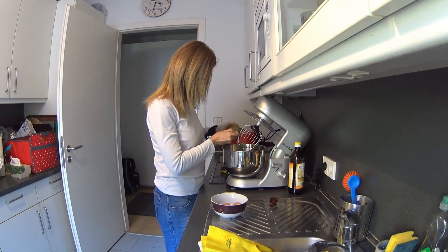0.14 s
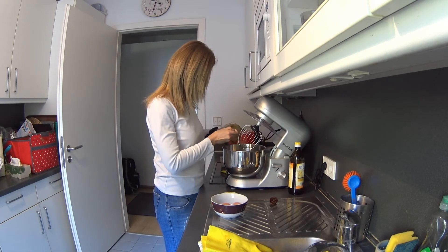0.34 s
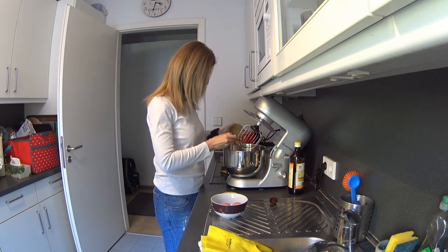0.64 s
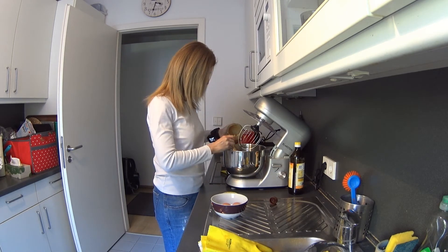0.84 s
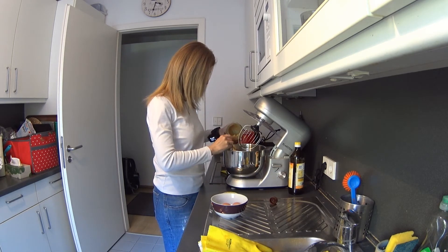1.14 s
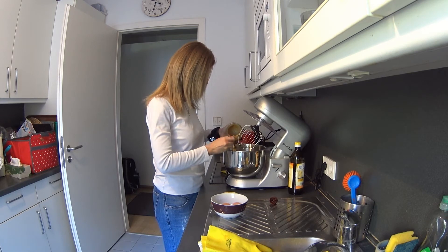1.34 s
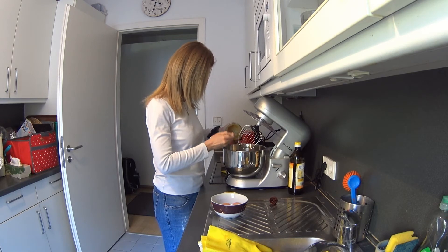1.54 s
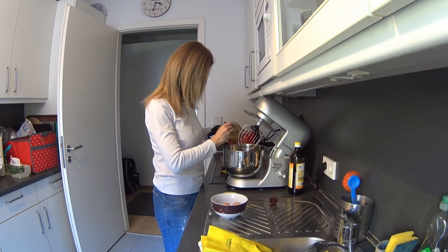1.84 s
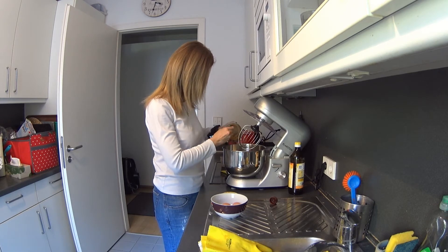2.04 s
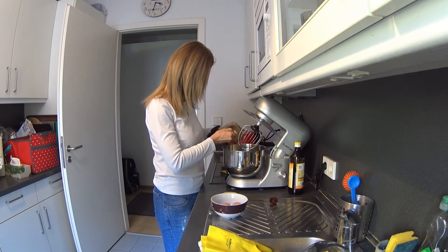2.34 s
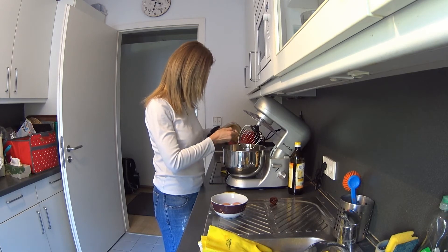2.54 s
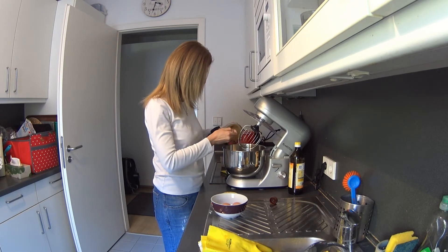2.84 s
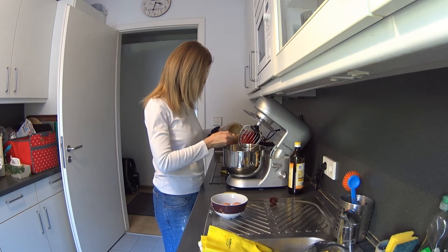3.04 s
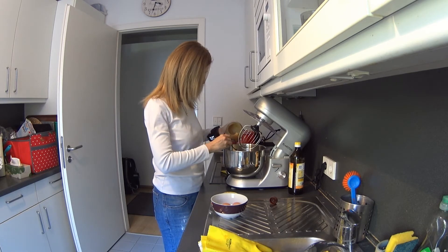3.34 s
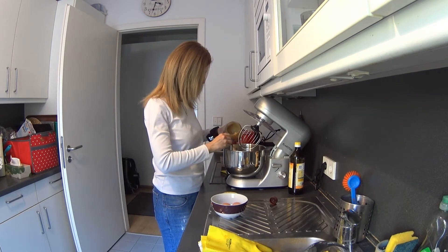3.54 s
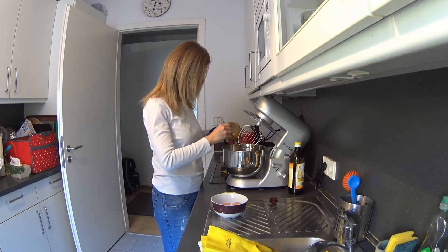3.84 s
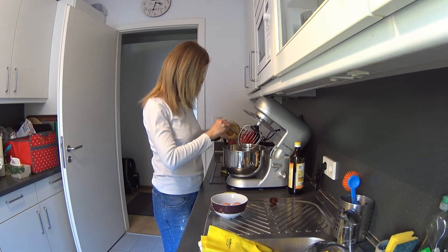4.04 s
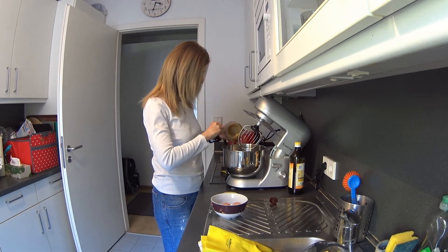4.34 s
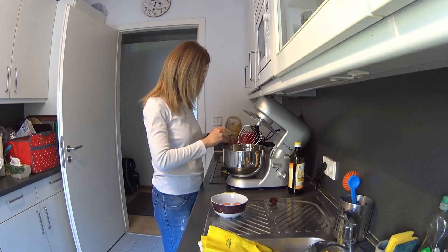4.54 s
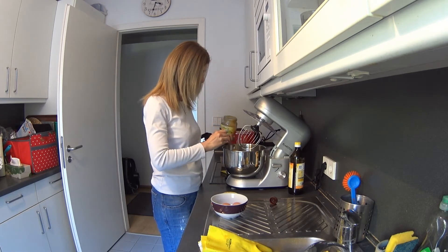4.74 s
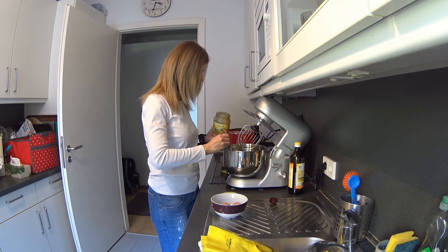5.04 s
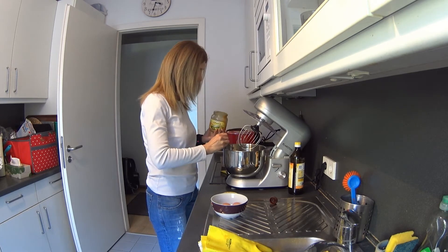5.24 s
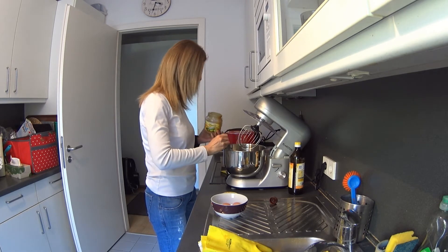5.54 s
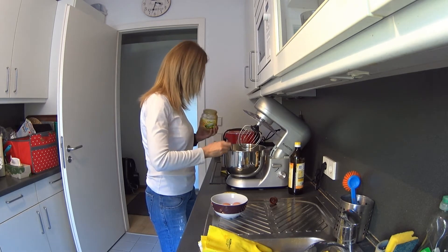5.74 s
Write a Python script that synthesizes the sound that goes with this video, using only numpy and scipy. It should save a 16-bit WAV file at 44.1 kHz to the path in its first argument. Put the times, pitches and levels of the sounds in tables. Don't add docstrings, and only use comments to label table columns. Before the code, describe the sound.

Bright glass-and-metal clinks, one short gritty scrape, then a soft footfall and shoe slide, over quiet room hiss and fridge hum.

```python
import sys
import numpy as np
from scipy import signal
from scipy.fft import rfft, irfft, next_fast_len
from scipy.io import wavfile
from scipy.ndimage import uniform_filter1d

SR = 44100
rng = np.random.default_rng(int(sys.argv[2]) if len(sys.argv) > 2 else 0)


def persist_wave(psi):
    counts = np.round(np.clip(psi, -1, 1) * 32767).astype(np.int16)
    wavfile.write(sys.argv[1], SR, np.atleast_2d(counts).T)


def undo_db(level):
    steps = np.asarray(level, float) / 20
    return 10 ** steps


N = 259616


def on_log(table, hz):
    f, v = np.transpose(table)
    return np.interp(np.log(np.maximum(hz, 1)), np.log(f), v)


def shaped(x, table):
    n = x.shape[-1]
    size = next_fast_len(n)
    gain = undo_db(on_log(table, np.fft.rfftfreq(size, 1 / SR)))
    return irfft(rfft(x, size) * gain, size)[..., :n]


def unit(x):
    return x / np.sqrt(np.mean(x ** 2))


def add(out, s, x):
    i = int(s * SR)
    out[i:i + len(x)] += x[:len(out) - i]


def ring(hz, strength, rise_cycles, twin_db=-13):
    t = np.arange(SR // 3) / SR
    hz = np.reshape(hz, (-1, 1))
    db, t60 = np.transpose(strength)[:, :, None]
    off = 1 + 0.024 * rng.standard_normal((2, len(hz), 1))
    hz = np.r_[hz, hz * off[0], hz * off[1]]
    db = np.r_[db, db + twin_db, db + twin_db]
    t60 = np.r_[t60, 0.45 * t60, 0.45 * t60]
    sign = rng.choice([-1, 1], size=hz.shape)
    swell = 1 - np.exp(-t * hz / rise_cycles)
    decay = np.exp(-np.log(1000) * t / np.clip(t60, 0.004, 0.4))
    y = (sign * undo_db(db) * swell * decay * np.sin(2 * np.pi * hz * t)).sum(axis=0)
    return y / np.abs(y).max()


def blows(hits, hz, strength, rise_cycles, low_hz):
    out = np.zeros(N)
    body = ring(hz, strength, rise_cycles)
    t = np.arange(SR // 25) / SR
    thin = signal.butter(4, low_hz, "high", fs=SR, output="sos")
    dull = signal.butter(2, [330, 1400], "band", fs=SR, output="sos")
    for s, db, ms, crack_db, thud_db in hits:
        push = t[:200] * np.exp(-t[:200] / (max(ms, 0.005) / 1000))
        noise = rng.standard_normal((2, len(t))) * np.minimum(t / 0.0023, 1)
        crack = signal.sosfilt(thin, noise[0] * np.exp(-t / 0.0098))
        thud = 4 * signal.sosfilt(dull, noise[1] * np.exp(-t / 0.01))
        add(out, s, undo_db(db) * body)
        add(out, s, undo_db(db + crack_db) * np.convolve(crack, push / push.sum()))
        add(out, s, undo_db(db + thud_db) * thud)
    return out


def knocks(events, spread, rub_s):
    out = np.zeros(N)
    t = np.arange(SR // 40) / SR
    for s, db, hz, t60 in events:
        detune = spread * np.clip(np.r_[0, rng.standard_normal(2)], -2, 2)
        body = ring(hz * (1 + detune), [(-3.0, t60), (-5.0, t60), (-10.0, t60)], rise_cycles=0.16)
        rub = (0.39 + rng.standard_normal(len(t))) * np.exp(-t / rub_s)
        knock = signal.fftconvolve(body, rub)
        add(out, s, undo_db(db) * knock / np.abs(knock).max())
    return out


# pitch in Hz, level in dB, line width in Hz, wobble share.
FRIDGE_LINES = [(48.5, -50, 3.8, 0.27), (72.6, -60, 7.7, 0.36), (93.7, -68, 8, .55), (100, -62, 11, 0.81),
                (592, -70.5, 3, 0.46), (4160, -85, 2, 1)]


def fridge():
    t, out = np.arange(N) / SR, 0
    for hz, db, width_hz, share in FRIDGE_LINES:
        k = int(SR / width_hz)
        wobble = [unit(uniform_filter1d(uniform_filter1d(rng.standard_normal(N), k), k)) for _ in range(2)]
        drift = 1.32 + share * (wobble[0] + 1j * wobble[1])
        out = out + undo_db(db) * np.real(drift * np.exp(2j * np.pi * hz * t))
    return out


# frequency in Hz, density in dB per Hz.
AIR_COLOUR = [(15, -23), (35, -17.5), (100, -11), (140, -16), (300, -19), (700, -25.5), (1270, -28),
              (4230, -37), (6500, -42.5), (7600, -50.5), (8600, -45), (9400, -47), (10200, -51.5),
              (11000, -46.5)]
# frequency in Hz, side minus mid in dB.
AIR_WIDTH = [(60, -12), (110, -8), (190, -2.5), (340, 0), (610, 4.5), (1100, 5), (1960, 4), (3510, 1),
             (6270, -3.5), (11200, -8.5)]


def air():
    mid, side = shaped(rng.standard_normal((2, N)), AIR_COLOUR)
    return undo_db(-56) * np.array([mid, shaped(side, AIR_WIDTH)]) / np.std(mid)


# start in seconds, peak level in dB, held level in dB,
# top frequency in Hz at the peak, top frequency in Hz once slowed.
FOOT_SLIDES = [
    (.001, -51.5, -64.5, 2800, 1200),
    (5.755, -45, -55, 4220, 3750),
]


def shuffle():
    onset_s, settle_s, length_s = 0.011, 0.045, 0.45
    lead_db, lead_s = -14.5, 0.07
    out, t = np.zeros(N), np.arange(N) / SR
    unevenness = unit(uniform_filter1d(rng.standard_normal(N), 150))
    grain = rng.standard_normal(N) * undo_db(1.2 * unevenness)
    for s, peak_db, held_db, fast_hz, slow_hz in FOOT_SLIDES:
        dull, sharp = (unit(shaped(grain, [(60, -20), (300, 0), (hz / 2.2, -3), (hz, -9), (hz * 2.0, -34)]))
                       for hz in (slow_hz, fast_hz))
        early, late = np.maximum(s - t, 0), np.maximum(t - s, 0)
        speed = np.exp(-late / settle_s)
        db = held_db + (peak_db - held_db) * speed + lead_db * (1 - np.exp(-early / onset_s))
        moving = (early < lead_s) * (late < length_s)
        out += moving * undo_db(db) * (dull + speed * (sharp - dull))
    return out


# start in seconds, level in dB, pitch in Hz, t60 in seconds.
FOOTFALLS = [
    (5.655, -43, 40, .08),
    (5.697, -37, 40, .14),
    (5.72, -42, 98, .15),
    (5.785, -45, 98, .12),
    (.002, -46, 95, .1),
]


def footsteps():
    return knocks(FOOTFALLS, spread=0.09, rub_s=0.0012)


# start in seconds, level in dB, pitch in Hz.
FOOD_CLICKS = [(.01, -48.5, 900), (.035, -40, 1340), (.05, -45.5, 480), (.19, -45.5, 480), (.235, -48, 480),
               (.795, -57, 7470), (.796, -67, 9600), (.89, -49, 1970), (1.045, -63, 7600),
               (1.14, -68, 9350), (3.446, -64, 9050), (3.447, -61, 5240), (3.82, -61.5, 8130),
               (4.75, -64, 8970), (5.1, -50, 950), (5.45, -56.5, 9500), (5.455, -59, 4480),
               (5.675, -57.5, 7600), (5.69, -61.5, 9000)]


def food_clicks():
    return knocks([(s, db, hz, min(62 / hz, 0.064)) for s, db, hz in FOOD_CLICKS], spread=0.05, rub_s=0.0024)


# start in seconds, level in dB, contact in ms, crack in dB, thud in dB.
TOUCH_HITS = [
    (.128, -21.5, 0.032, -6.5, -23),
    (.145, -36, .03, -14, -17),
]
TOUCH_HZ = [(474, 641, 1355, 2007, 2089, 2277, 2353, 2842, 2948, 3953, 4171, 4752, 5340, 5687, 6476, 7051, 7301, 9292, 10872, 10990)]
# level in dB, t60 in seconds.
TOUCH_MODES = [(-27, 0.095), (-22.5, 0.077), (-33, 0.13), (-24, 0.1), (-16, 0.079), (-2.5, 0.057),
               (-8, 0.088), (-19, 0.084), (-21, 0.055), (-33, 0.13), (-28, 0.055), (-25, 0.082),
               (-17, 0.043), (-21, 0.059), (-24, 0.056), (-19, 0.05), (-17, 0.075), (-32, 0.1),
               (-40, 0.083), (-31, 0.072)]


def light_touch():
    return blows(TOUCH_HITS, TOUCH_HZ, TOUCH_MODES, rise_cycles=2.8, low_hz=1740)


CLOCK_PITCHES = [(820, 1130, 1367, 1970, 2400, 3630)]
# level in dB, t60 in seconds.
CLOCK_MODES = [(3, 0.08), (-11.5, 0.07), (-12.5, 0.047), (-13.5, 0.066), (-17, .03), (-15.5, 0.016)]
# level in dB, contact in ms, crack in dB, thud in dB.
HAND_RELEASE = (-49.5, 0.3, -8.5, -8)
# level in dB, contact in ms, crack in dB, thud in dB.
HAND_CATCH = (-44.5, 0.4, -6, -10)


def wall_clock():
    ticks = []
    for s in 0.874 + 1.0003 * np.arange(6):
        ticks += [(s, *HAND_RELEASE), (s + 0.014, *HAND_CATCH)]
    ticks = [row for row in ticks if row[0] < N / SR]
    return blows(ticks, CLOCK_PITCHES, CLOCK_MODES, rise_cycles=1.5, low_hz=900)


# start in seconds, level in dB, contact in ms, crack in dB, thud in dB.
RIM_TAPS = [
    (1.9112, -8.5, 0.0041, -11.5, -28.5),
    (1.917, -13, .01, -5, -22.5),
]
RIM_PITCHES = [(670, 1996, 2058, 2202, 2249, 2392, 2869, 2947, 3088, 3143, 3795, 3895, 4060, 4860, 4935, 5061, 5228, 5412, 5487, 5696, 6031, 6476, 7005, 8169, 8795, 9026, 10805, 10968)]
# level in dB, t60 in seconds.
RIM_MODES = [(-27, 0.087), (-30.5, 0.061), (-27, 0.097), (-12, 0.14), (-6.5, 0.053), (-16.5, 0.049),
             (-9.5, 0.092), (-37.5, 0.097), (-13, 0.047), (-9.5, 0.079), (-24.5, 0.12), (-30.5, 0.043),
             (-1.5, 0.26), (-25.5, 0.13), (-17.5, 0.43), (-33.5, 0.13), (-3, 0.023), (-12.5, 0.09),
             (-32.5, 0.03), (-13, 0.073), (-15, 0.084), (-12, 0.073), (-23.5, 0.09), (-22.5, 0.09),
             (-34, 0.036), (-20, 0.09), (-18.5, 0.19), (-18, 0.079)]


def rim_tap():
    return blows(RIM_TAPS, RIM_PITCHES, RIM_MODES, rise_cycles=2.5, low_hz=2240)


# start in seconds, level in dB, contact in ms, crack in dB, thud in dB.
WALL_TAPS = [
    (2.141, -6, 0.018, -15.5, -34.5),
    (2.1435, -17.5, 0.018, -15, -20.5),
]
WALL_PITCHES = [(671, 765, 822, 2205, 2566, 3089, 3166, 3313, 3415, 4158, 4341, 4937, 5150, 5257, 5718, 5872, 6370, 6416, 6803, 7362, 7734, 9065, 9236, 9413, 10584, 10680, 10739, 10826)]
# level in dB, t60 in seconds.
WALL_MODES = [(-13.5, 0.074), (-27, 0.062), (-27.5, 0.022), (-4.5, 0.097), (-6.5, 0.029), (-21.5, 0.15),
              (-6, 0.045), (-12, 0.067), (-24, 0.28), (-11, 0.037), (-8, 0.046), (-10.5, 0.05),
              (-15.5, 0.049), (-32.5, 0.055), (1, 0.03), (-17, 0.2), (-32, 0.048), (-21.5, 0.085),
              (-30, 0.12), (-25.5, 0.15), (-30, 0.037), (-19, 0.057), (-13, 0.029), (-52, 0.04),
              (-30.5, 0.12), (-41, 0.25), (-51.5, 0.11), (-27.5, 0.065)]


def wall_tap():
    return blows(WALL_TAPS, WALL_PITCHES, WALL_MODES, rise_cycles=4.0, low_hz=1770)


# start in seconds, level in dB, contact in ms, crack in dB, thud in dB.
FIRM_HITS = [
    (4.102, -5, 0.041, -8, -28.5),
    (4.108, -12.5, .03, -9, -26.5),
]
FIRM_HZ = [(445, 639, 1709, 1870, 2063, 2266, 2425, 2521, 2987, 3095, 3189, 3818, 3916, 4126, 4384, 4490, 4546, 4642, 5296, 5410, 5771, 6046, 6475, 6620, 7254, 7328, 9102, 9308)]
# level in dB, t60 in seconds.
FIRM_MODES = [(-25.5, 0.11), (-23, 0.093), (-34, 0.14), (-26, 0.17), (-12, 0.11), (-2.5, 0.15), (-11, 0.12),
              (-12.5, 0.09), (-27.5, 0.13), (-16.5, 0.055), (-9.5, 0.18), (-25, 0.15), (-12.5, 0.15),
              (-15, 0.12), (-11.5, 0.05), (-14.5, 0.084), (-20.5, 0.051), (-20, 0.09), (-29.5, 0.14),
              (-5.5, 0.055), (-20.5, 0.12), (-10.5, 0.071), (-21, 0.1), (-10, 0.1), (-6, 0.14), (-21, 0.11),
              (-27.5, 0.13), (-30, 0.12)]


def firm_blow():
    return blows(FIRM_HITS, FIRM_HZ, FIRM_MODES, rise_cycles=1.2, low_hz=1600)


SCRAPE_HZ = [(447, 670, 774, 1881, 2064, 2132, 2260, 2427, 2573, 3188, 3548, 3675, 3925, 4380, 5196, 5373, 5490, 5774, 6296, 6366, 7058, 7150, 7228, 7332, 8395, 9041, 9971, 10888)]
# level in dB, t60 in seconds.
SCRAPE_MODES = [(-21.5, 0.12), (-9.5, 0.081), (-21, 0.12), (-25, 0.068), (-12, 0.083), (-8.5, 0.047),
                (3.5, 0.053), (-9.5, 0.12), (-28, 0.16), (-8.5, 0.17), (-21, 0.11), (-16.5, 0.11),
                (-17, 0.14), (-22, 0.16), (-3, 0.039), (-6.5, 0.079), (-24, 0.12), (-10.5, 0.034),
                (-29, 0.073), (-34, 0.1), (-33, 0.089), (-17, 0.086), (-28, 0.12), (-15, 0.066),
                (-31, 0.09), (-22, 0.062), (-24, 0.047), (-22.5, 0.077)]
# centre in seconds, extra level in dB.
PRESSURE_SURGES = [
    (4.311, 3.8),
    (4.372, 2.3),
]


def scrape():
    start_s, end_s, level_db = 4.283, 4.378, -34
    grip_db_per_s, lift_db_per_s, surge_s = 1500, 950, 0.012
    flick_s, flick_rise_s, slow_treble_db, fast_treble_db = 4.349, 0.0067, -10.5, 3.5
    t = np.arange(N) / SR
    db = level_db - grip_db_per_s * np.maximum(start_s - t, 0) - lift_db_per_s * np.maximum(t - end_s, 0)
    for s, more_db in PRESSURE_SURGES:
        db = db + more_db * np.exp(-((t - s) / surge_s) ** 2)
    flick = 0.5 * (1 + np.tanh((t - flick_s) / flick_rise_s / 2))
    treble_db = slow_treble_db + (fast_treble_db - slow_treble_db) * flick
    slips = rng.random(N) < 7000 / SR
    clicks = slips * rng.standard_normal(N) * undo_db(1.2 * rng.exponential(size=N))
    clicks = unit(clicks) * undo_db(np.maximum(db, -200))
    slow = shaped(clicks, [(3000, 0.5), (6000, -4.5), (11000, -8.5)])
    bright = np.diff(clicks * undo_db(treble_db), 2, prepend=[0, 0])
    force = slow + bright
    body = ring(SCRAPE_HZ, SCRAPE_MODES, rise_cycles=0.45)
    ringing = signal.fftconvolve(force, body)[:N] / np.sqrt(np.sum(body ** 2))
    grit = shaped(force, [(250, -43), (600, 2), (2500, -6), (4500, -0.5), (5400, -1.5), (7000, -2.5),
                          (11000, -25.5)])
    return ringing + grit


# frequency in Hz, t60 in seconds.
KITCHEN_T60 = [(250, 0.33), (1000, 0.4), (3000, 0.39), (6000, 0.3), (11000, 0.19)]
# frequency in Hz, side minus mid in dB.
KITCHEN_WIDTH = [(100, -29), (300, -4), (600, -7), (1500, -1.5), (3000, -4), (6000, -8), (11000, -5)]


def room(x):
    t, tail = np.arange(SR // 2) / SR, 0
    for hz in 88 * 2.0 ** np.arange(8):
        octave = [(hz / 2, -40), (hz / 1.3, 0), (hz * 1.3, 0), (hz * 2, -40)]
        band = shaped(rng.standard_normal((2, len(t))), octave)
        tail = tail + band * np.exp(-np.log(1000) * t / on_log(KITCHEN_T60, hz))
    spectrum = rfft(tail)
    tail = irfft(spectrum / np.sqrt(uniform_filter1d(np.abs(spectrum) ** 2, size=14)), len(t))
    tail = np.array([shaped(tail[0], [(80, -28.5), (250, 0.5)]), shaped(tail[1], KITCHEN_WIDTH)])
    tail = tail * np.minimum(t / 0.002, 1) * np.clip((0.455 - t) / 0.1, 0, 1)
    return signal.fftconvolve(x[None], tail, axes=1)[:, :N]


def scene():
    jar = light_touch() + rim_tap() + wall_tap() + firm_blow() + scrape()
    clock, food, feet = wall_clock(), food_clicks(), shuffle()
    to_room = undo_db(-2.5) * jar + undo_db(-6.5) * clock + undo_db(-2) * food + undo_db(0.5) * feet
    mid, side = room(to_room) + air()
    mid = mid + jar + clock + food + feet + footsteps() + fridge()
    side = side - 0.055 * jar
    return np.array([mid + side, mid - side])


def low_pass(x):
    return signal.sosfilt(signal.butter(12, 11820, fs=SR, output="sos"), x)


def record(dry):
    top_cut = signal.ellip(12, 0.5, 45, 11020, fs=SR, output="sos")
    mix = signal.sosfilt(top_cut, dry)
    return low_pass(mix)


dry = scene()
out = record(dry)
persist_wave(out)
```